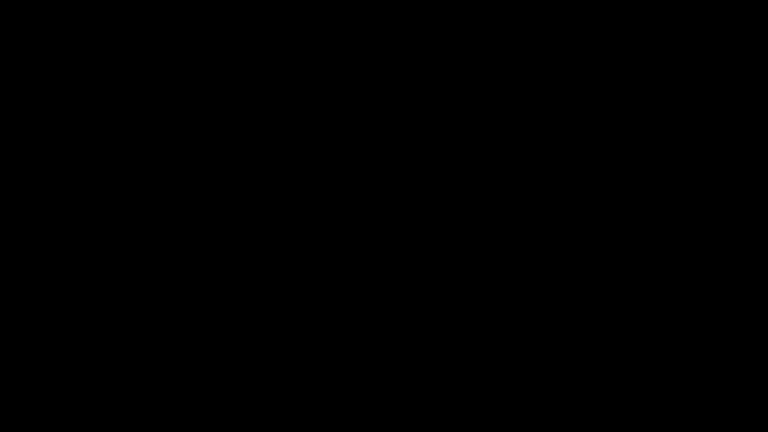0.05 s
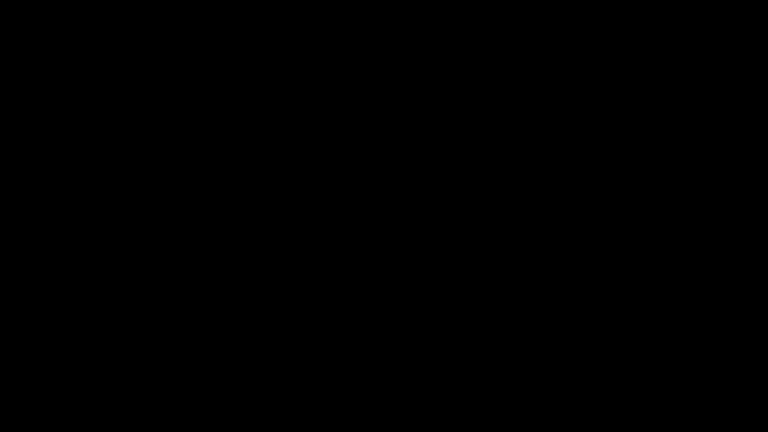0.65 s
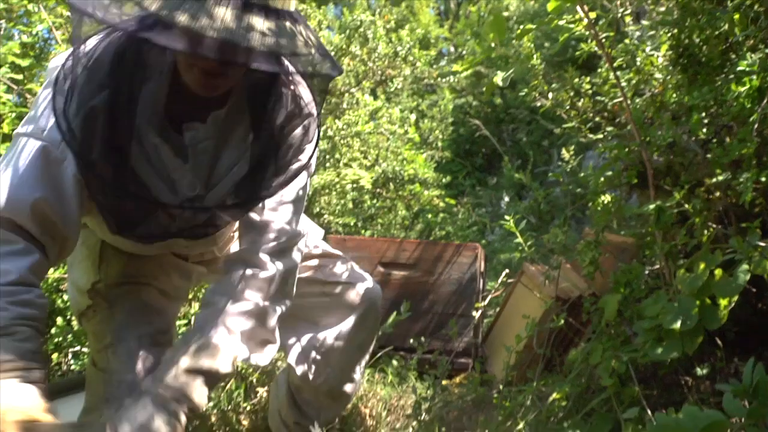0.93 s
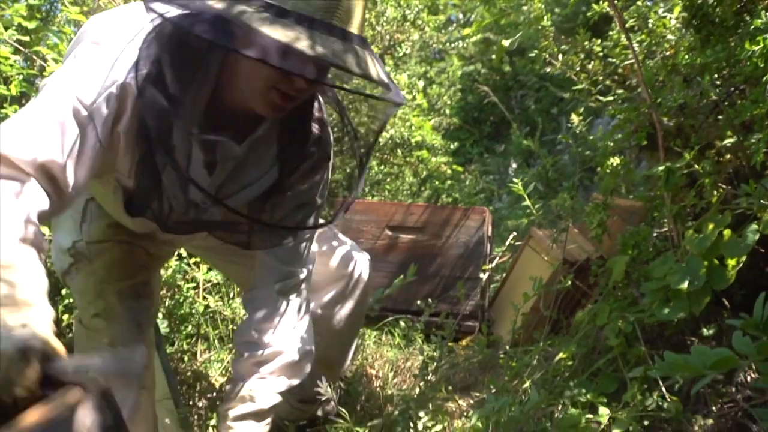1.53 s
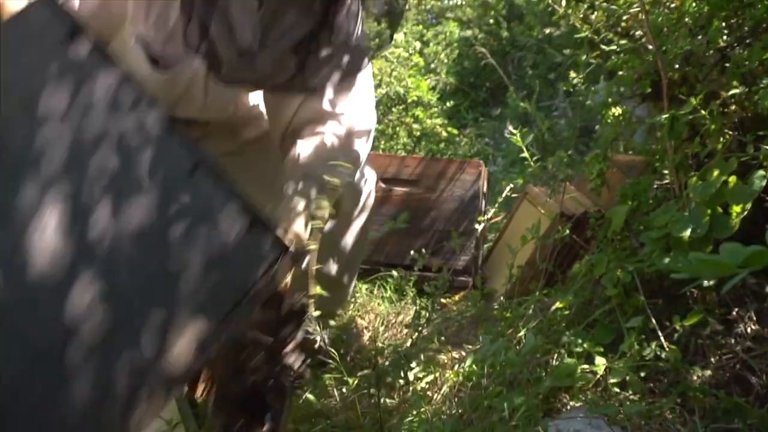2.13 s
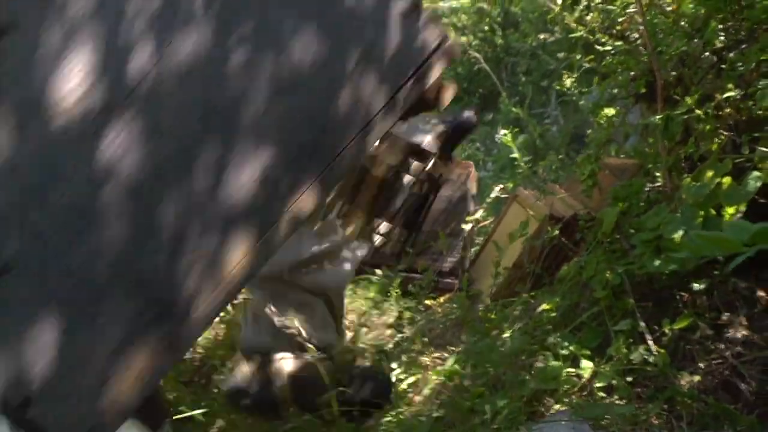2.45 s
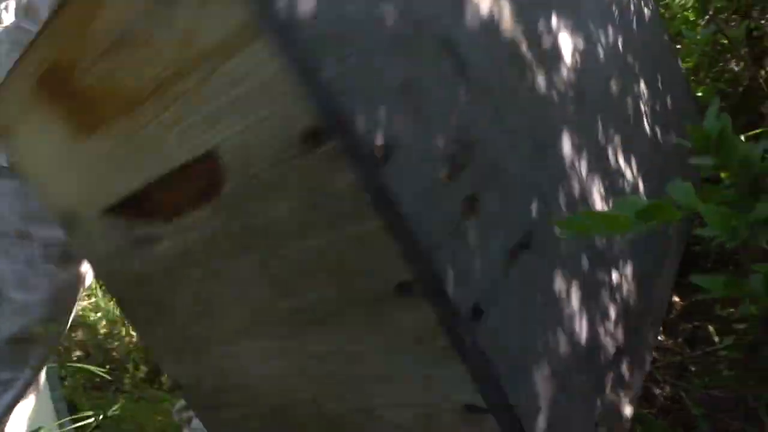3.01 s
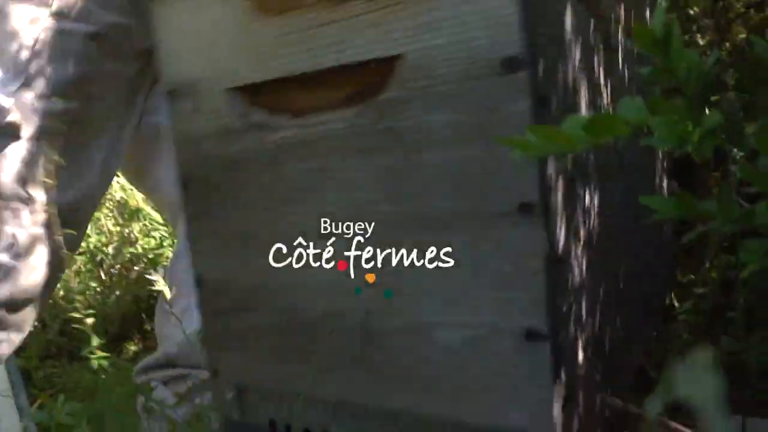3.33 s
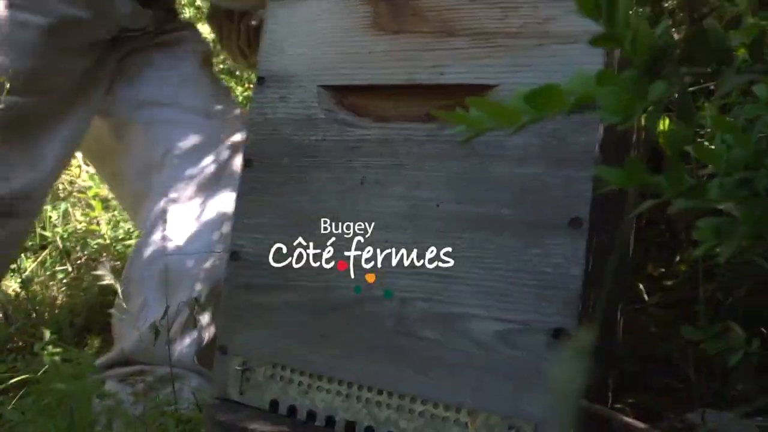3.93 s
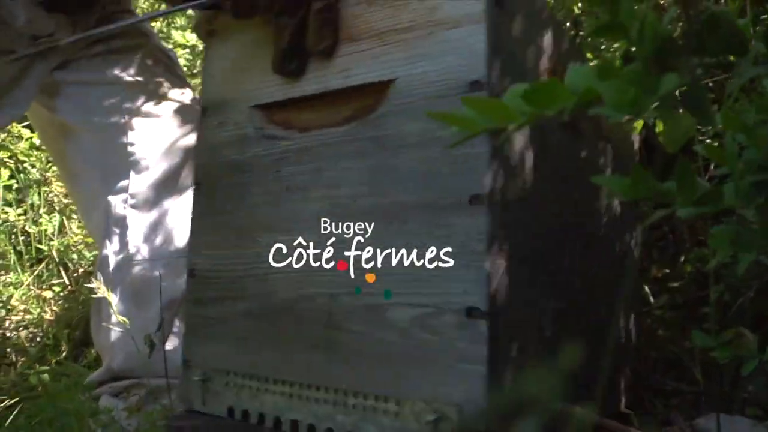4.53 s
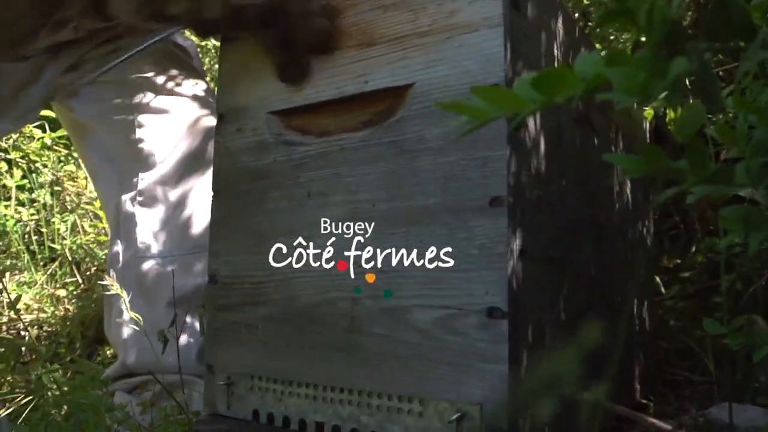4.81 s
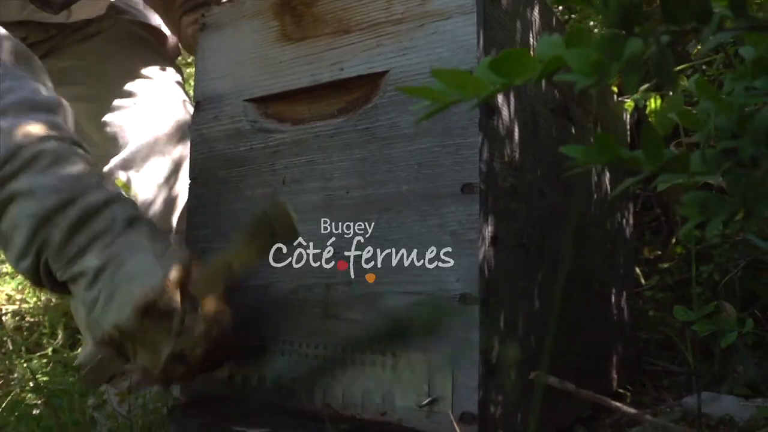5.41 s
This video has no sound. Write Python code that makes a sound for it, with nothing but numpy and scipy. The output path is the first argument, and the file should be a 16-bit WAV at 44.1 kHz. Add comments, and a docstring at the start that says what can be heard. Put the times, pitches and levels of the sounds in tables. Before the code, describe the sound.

Outdoors, a wooden hive box is dragged out of the grass close by, with cloth rustling and dry stems snapping. It bumps down with hollow thuds, then is shoved into place, the wood rasping and briefly groaning. A steel tool clacks on the lid and ends with a short scrape and a sharp knock. Bees hum faintly over a low breeze while a small bird repeats a trill.

```python
"""A wooden hive box is dragged out of the grass, set on its floor board and shoved into place.
Bumps ring its modes; wood catching and slipping on wood judders, rasps and groans.
The beekeeper's steel hive tool clacks on the lid, then scrapes and knocks at the entrance.
Suit and grass rustle, dry stems snap, bees' wing beats hum faintly over a low breeze,
and a small bird repeats a trill in the trees."""
import sys
import numpy as np
from scipy import signal
from scipy.fft import rfft, irfft, next_fast_len
from scipy.io import wavfile
from scipy.ndimage import map_coordinates

SR = 44100
rng = np.random.default_rng(int(sys.argv[2]) if len(sys.argv) > 2 else 0)


def master_out(mix):
    """Clip the mix to full scale and print it as 16-bit PCM to the path in sys.argv[1]."""
    frames = np.transpose(np.atleast_2d(mix))
    ceiling = np.clip(frames, -1, 1)
    pcm = np.round(ceiling * 32767).astype(np.int16)
    wavfile.write(sys.argv[1], SR, pcm)


N = 249606


def amp(db):
    """Decibels to gain."""
    return 10 ** (np.asarray(db) / 20)


def unit(x):
    """Scale to rms 1."""
    return x / np.sqrt(np.mean(x ** 2) + 1e-20)


def clock(seconds):
    """Sample times from zero."""
    return np.arange(int(seconds * SR)) / SR


def decay(t, t60_s):
    """Exponential fall, 60 dB in t60_s."""
    return np.exp(-np.log(1000) * t / t60_s)


def stroke(start_s, end_s, attack_s, t60_s):
    """Envelope of one movement: ramp, hold, decay."""
    t = np.arange(N) / SR
    return np.clip((t - start_s) / attack_s, 0, 1) * decay(np.maximum(t - end_s, 0), t60_s)


def curve_db(points):
    """Per-sample level through (s, dB) points, -120 dB outside them."""
    return np.interp(np.arange(N) / SR, *np.transpose(points), left=-120, right=-120)


def wobble(rate_hz):
    """Smooth random curve, rate_hz knots a second."""
    knots = rng.standard_normal(int(N * rate_hz / SR) + 4)
    return map_coordinates(knots, [np.arange(N) * rate_hz / SR])


def grains(rate_hz, spread_db):
    """Tiny random slips of scattered size and either sign."""
    size = amp(spread_db * np.clip(rng.standard_normal(N), -2, 2))
    return (rng.random(N) < rate_hz / SR) * rng.uniform(-1.11, 1, N) * size


def colour(x, spectrum):
    """Shape x by (Hz, dB) points on a log axis."""
    size = next_fast_len(len(x) + 8192)
    hz, db = np.transpose(spectrum)
    gain = amp(np.interp(np.log(np.fft.rfftfreq(size, 1 / SR) + 1), np.log(hz), db))
    return irfft(rfft(x, size) * gain, size)[:len(x)]


def band(x, lo_hz, hi_hz, order):
    """Causal band-pass."""
    return signal.sosfilt(signal.butter(order, [lo_hz, hi_hz], 'band', fs=SR, output='sos'), x)


def add(track, start_s, sound):
    """Mix a sound in at start_s."""
    start = max(round(start_s * SR), 0)
    part = sound[:max(N - start, 0)]
    track[start:start + len(part)] += part


# Each row: frequency in Hz, gain in dB.
AIR_SPECTRUM = [(12, -37), (20, 2), (41, -1.5), (134, -6), (241, -8.5), (285, -9), (422, -5), (607, -13.5),
                (1150, -12.5), (3530, -27.5), (4540, -14.5), (5080, -29), (14300, -38.5), (16000, -32)]
def air():
    """Soft outdoor hush."""
    return amp(-56.5) * unit(colour(rng.standard_normal(N), AIR_SPECTRUM))


# Each row: time in seconds, level in dB.
BREEZE_LEVELS = [(0.1, -75), (0.7, -54), (1.82, -53), (2.52, -57.5), (3.95, -43.5), (5.04, -50),
                 (5.66, -49.5)]
def breeze_and_handling():
    """Low, uneven breeze rumble, with a brief jolt of handling noise once the box is down."""
    spectrum = [(8, -17.5), (20, 8.5), (35, -1), (65, -12.5), (95, -3.5), (125, -26), (300, -76)]
    rumble = unit(colour(rng.standard_normal(N), spectrum))
    jolt = amp(-47.5) * stroke(start_s=3.91, end_s=3.97, attack_s=.027, t60_s=.18)
    return (amp(curve_db(BREEZE_LEVELS)) + jolt) * rumble


def bees(count=7):
    """Each bee is a stack of wing-beat harmonics wandering in pitch and distance."""
    hum = np.zeros(N)
    for wing_hz in np.linspace(175, 250, count):
        drift = 1 + .049 * wobble(3.3) + .00876 * wobble(25)
        phase = 2 * np.pi * np.cumsum(wing_hz * drift) / SR
        hum += amp(2.4 * wobble(1.2)) * signal.sawtooth(phase)
    spectrum = [(200, -1), (420, -4), (1000, 3.5), (3000, -12), (7000, -24)]
    return amp(-63.5) * unit(colour(hum, spectrum))


# Each row: time in seconds, level in dB.
RUSTLE_LEVELS = [(0.15, -92), (0.49, -71), (0.76, -65), (1.13, -62), (1.55, -66.5), (1.75, -58.5),
                 (1.99, -60), (2.14, -74), (2.48, -73), (2.88, -65), (3.57, -60.5), (3.88, -69.5),
                 (4.19, -67.5), (4.4, -61), (4.74, -62.5), (4.92, -73.5), (5.4, -68.5), (5.66, -69.5)]
# Each row: frequency in Hz, gain in dB.
CLOTH_SPECTRUM = [(150, -12), (400, 3), (1000, -2.5), (2500, 4), (6000, -2.5), (9000, -4.5), (14000, -17),
                  (16000, -68)]
def rustle(stir_s=.027):
    """Suit fabric hisses, grass crackles in clumps; each shove of the hive stirs both."""
    hiss = unit(colour(rng.standard_normal(N), CLOTH_SPECTRUM)) * amp(1.2 * wobble(40))
    clumps = amp(3 * wobble(45)) * grains(rate_hz=800, spread_db=3.8)
    crackle = unit(colour(clumps, [(800, -14), (3000, -2), (7000, 0), (16000, -8)]))
    stirs = sum(stroke(s, s + stir_s, stir_s, t60_s=.045) for s, *_ in HIVE_SHOVES)
    envelope = amp(curve_db(RUSTLE_LEVELS) + 1) + amp(-52.5) * stirs
    return envelope * (amp(1.3) * hiss + amp(-1.7) * crackle)


def chirp(start_hz, end_hz, seconds):
    """Gliding whistle that swells and fades."""
    progress = clock(seconds) / seconds
    hz = start_hz + (end_hz - start_hz) * progress
    return np.sin(np.pi * progress) * np.sin(2 * np.pi * np.cumsum(hz) / SR)


# Each row: start in seconds, level in dB.
TRILL_CALLS = [(0.227, -59), (0.484, -59.5), (0.724, -59.5), (0.928, -58.5), (1.179, -58), (1.55, -61.5),
               (2.019, -59.5), (2.149, -61), (2.39, -59.5), (2.653, -58), (2.884, -59.5), (3.11, -61.5),
               (3.641, -60.5), (3.888, -61.5), (4.111, -60), (4.919, -65)]
# Other birds. Each row: start in seconds, start pitch in Hz, end pitch in Hz, level in dB.
WHISTLE_CALLS = [(4.05, 5970, 5150, -57.5), (5.11, 6300, 4950, -52), (5.601, 3340, 3020, -55)]
def birds(flicks=4, flick_gap_s=.029, rise_delay_s=.06):
    """Trills of falling flicks over a thin rising note, and lone whistles; the trees smear them."""
    song = np.zeros(N)
    for start_s, db in TRILL_CALLS:
        for k in range(flicks):
            pitch = 1 + .012 * rng.standard_normal()
            flick_s = start_s + k * flick_gap_s + rng.normal(0, .003)
            gain = amp(db + 7 + rng.normal(0, 2))
            add(song, flick_s, gain * chirp(4720 * pitch, 4260 * pitch, seconds=.018))
        add(song, start_s + rise_delay_s, amp(db - 2) * chirp(4600, 4880, seconds=.11))
    for start_s, start_hz, end_hz, db in WHISTLE_CALLS:
        add(song, start_s, amp(db) * chirp(start_hz, end_hz, seconds=.06))
    t = clock(.5)
    trees = rng.standard_normal(len(t)) * decay(t, .26)
    reverb = signal.fftconvolve(song, trees / np.linalg.norm(trees))[:N]
    return amp(-3) * song + amp(-7) * reverb


# Each row: start in seconds, level in dB, pitch in Hz, relative fizz level in dB.
STEM_SNAPS = [(0.983, -48.5, 3300, -22), (1.138, -51.5, 2990, 3), (1.176, -43, 3320, -7),
              (1.362, -35, 1960, -14.5), (1.5162, -37, 2500, -7), (1.717, -38, 2330, -2.5),
              (1.8379, -24.5, 2240, -1), (1.89, -27, 2270, 0), (2.1391, -31.5, 2850, -19),
              (3.6965, -20.5, 2430, -18.5), (3.783, -48, 3400, -6), (3.824, -39.5, 3340, -6.5),
              (4.905, -37, 2854, -8), (4.9206, -35, 3000, -11), (5.1117, -42.5, 2930, -23),
              (5.1447, -40, 3140, -30), (5.219, -36, 2880, -21)]
def snaps():
    """Dry stems and small clicks: a pitched pip, a wider splinter of noise and a high fizz."""
    out, t = np.zeros(N), clock(.1)
    envelope = decay(t, .04) + amp(-13) * decay(t, .13)
    for start_s, db, hz, fizz_db in STEM_SNAPS:
        pip, splinter, fizz = rng.standard_normal((3, len(t)))
        pip = amp(-8.5) * unit(band(pip, hz * .95, hz * 1.05, order=2))
        splinter = amp(-8) * unit(band(splinter, hz * .25, hz * 1.19, order=2))
        fizz = amp(fizz_db - 4.5) * unit(band(fizz, 5000, 8400, order=1))
        add(out, start_s, amp(db) * (pip + splinter + fizz) * envelope)
    return out


# Registers: boom, body, clack, crack. Each row: low edge in Hz, high edge in Hz.
REGISTERS_HZ = [(150, 380), (380, 700), (700, 2000), (2000, 16000)]
# Each entry: a register's gain in dB per dB of contact hardness.
HARDNESS_SLOPES = [0, .5, .8, 1.3]
def blows(hits, modes, voice_db, burst_db, burst_t60_s, tail_db, tail_t60_s, cutoff_hz, attack_s):
    """Each blow rings the modes over a noise burst of dense, short ones; hardness lifts the treble."""
    out, t = np.zeros(N), clock(.5)
    onset = t < .02
    hz, mode_db, t60_s = np.transpose(modes)[:, :, None]
    for start_s, level_db, hardness_db, body_db in hits:
        weights_db = np.add(voice_db, hardness_db * np.array(HARDNESS_SLOPES)) + [0, body_db, 0, 0]
        gains = amp(mode_db + rng.standard_normal(hz.shape))
        phases = .5 * rng.standard_normal(hz.shape)
        ring = gains * decay(t, t60_s) * np.sin(2 * np.pi * hz * t + phases)
        envelope = decay(t, burst_t60_s) + amp(tail_db) * decay(t, tail_t60_s)
        burst = rng.standard_normal(len(t)) * envelope
        burst = signal.lfilter(*signal.butter(2, cutoff_hz, fs=SR), burst)
        for (lo_hz, hi_hz), weight_db in zip(REGISTERS_HZ, weights_db):
            inside = (hz[:, 0] >= lo_hz) & (hz[:, 0] < hi_hz)
            tones = ring[inside].sum(0) * (1 - np.exp(-t * lo_hz))  # low modes build more slowly
            noise = band(burst, lo_hz, hi_hz, order=4)
            density = amp(burst_db) * np.sqrt(lo_hz / 700)  # modes crowd as pitch rises
            part = tones / (np.std(tones[onset]) + 1e-9) + density * noise / np.std(noise[onset])
            part *= 1 - np.exp(-t / attack_s)  # soft wood gives before it stops
            add(out, start_s, amp(level_db + weight_db) * part / np.std(part[onset]))
    return out


# Each row: start in seconds, level in dB, hardness in dB, extra body from the spot struck in dB.
BOX_BUMPS = [(1.263, -35.5, -3, -22), (1.469, -45, 2, 5), (1.569, -30, -3, -0.5), (1.88, -27, 0, 2.5),
             (1.992, -41.5, 10, 6), (3.188, -19.5, -44, -23), (3.4825, -19.5, -6.5, 9), (3.523, -24, -3, 3),
             (3.546, -30.5, -10, 17.5), (3.607, -36.5, 7.5, 5), (3.623, -24, -23, 6),
             (3.693, -13, -16, -0.5)]
# Each row: frequency in Hz, level in dB, t60 in seconds.
BOX_MODES = [(242, -29, 0.072), (275.8, 8, 0.078), (302.5, 2.5, 0.068), (382, -2, 0.077),
             (466.3, -7.5, 0.27), (577, -1, 0.021), (811, -2, 0.051), (1096, -13, 0.093),
             (1585, -16.5, 0.13), (2300, -15, 0.077), (2446, -11, 0.066)]
# Each entry: a register's gain in dB.
BOX_REGISTERS_DB = [-0.5, -6.5, -4.5, -14]
def box_bumps():
    """The held box bumps and booms."""
    return amp(-4.5) * blows(BOX_BUMPS, BOX_MODES, BOX_REGISTERS_DB, burst_db=-1.5, burst_t60_s=.058,
                             tail_db=-16.5, tail_t60_s=.16, cutoff_hz=2860, attack_s=.0015)


def ground_thuds(base_db=-22, db_per_bump_db=.57):
    """The ground takes the weight of each bump with a dull, low push."""
    out, t = np.zeros(N), clock(.3)
    for start_s, bump_db, *_ in BOX_BUMPS:
        thud = unit(band(rng.standard_normal(len(t)), 20, 87, order=2)) * decay(t, .17)
        add(out, start_s, amp(base_db + db_per_bump_db * bump_db) * thud)
    return out


# Each row: start in seconds, level in dB.
BOARD_TAPS = [(1.266, -36), (1.36, -34), (2.007, -38.5), (3.137, -41.5), (3.235, -33), (3.437, -38),
              (3.762, -37.5), (4.345, -24.5), (4.828, -28.5), (5.432, -30)]
# Each row: frequency in Hz, level in dB, t60 in seconds.
BOARD_MODES = [(524.5, -16, 0.18), (780, 4, 0.046), (962, -2, 0.022), (1086, -11.5, 0.073),
               (1670, -38, 0.02)]
def board_taps(attack_s=.0037):
    """Soft contacts ring a loose board's few modes and barely click."""
    out, t = np.zeros(N), clock(.2)
    for start_s, db in BOARD_TAPS:
        ring = sum(amp(mode_db) * decay(t, t60_s) * np.sin(2 * np.pi * (hz * t + rng.random()))
                   for hz, mode_db, t60_s in BOARD_MODES)
        click = unit(band(rng.standard_normal(len(t)), 330, 1670, order=2)) * decay(t, .068)
        add(out, start_s, amp(db + 6.5) * (ring + amp(-10) * click) * (1 - np.exp(-t / attack_s)))
    return out


def resonate(x, modes, t60_scale):
    """Drive a box's modes, damped by the hands that hold it."""
    t = clock(.2)
    ring = sum(amp(db) * decay(t, t60_s * t60_scale) * np.cos(2 * np.pi * hz * t)
               for hz, db, t60_s in modes)
    return unit(signal.fftconvolve(x, ring)[:N])


# Each row: start in seconds, end in seconds, judder level in dB, rasp level in dB.
SLIDE_PUSHES = [(1.297, 1.341, -46, -44.5), (1.565, 2.007, -40, -47), (1.668, 1.746, -35, -41),
                (3.128, 3.811, -39, -47.5), (3.432, 3.547, -32.5, -52), (3.82, 4.148, -54.5, -58),
                (4.435, 4.534, -28, -42.5), (4.57, 4.818, -38.5, -47), (4.958, 4.969, -45, -56.5),
                (5.425, 5.536, -53, -41.5)]
# Each row, in both: frequency in Hz, gain in dB.
JUDDER_SPECTRUM = [(100, -16), (170, 1), (330, -3), (440, -4), (600, -4.5), (900, -18.5), (2000, -51)]
RASP_SPECTRUM = [(300, -51), (600, 4.5), (900, 5), (1200, 2.5), (1600, 3), (1950, -2), (2350, -5),
                 (3300, -7.5), (5000, -9.5), (9000, -37)]
def sliding():
    """Wood catches and slips: coarse slips ring the held box, later the seated hive; fine ones rasp."""
    judder_gain, rasp_gain = np.zeros((2, N))
    for start_s, end_s, judder_db, rasp_db in SLIDE_PUSHES:
        push = stroke(start_s, end_s, attack_s=.031, t60_s=.4)
        judder_gain = np.maximum(judder_gain, amp(judder_db) * push)
        rasp_gain = np.maximum(rasp_gain, amp(rasp_db) * push)
    grip = amp(2.5 * wobble(40))
    judder = unit(colour(grip * grains(rate_hz=900, spread_db=0), JUDDER_SPECTRUM))
    rasp = unit(colour(grip * grains(rate_hz=3000, spread_db=2.5), RASP_SPECTRUM))
    held = unit(judder + amp(-3) * resonate(judder, BOX_MODES, t60_scale=.8))
    seated = unit(judder + amp(2) * resonate(judder, HIVE_MODES, t60_scale=.8))
    rasp = unit(rasp + amp(-6.5) * resonate(rasp, BOX_MODES, t60_scale=.26))
    before_tool = np.arange(N) / SR < LID_CLACKS[0][0]
    return judder_gain * np.where(before_tool, held, seated) + rasp_gain * rasp


# Each row: start in seconds, end in seconds, level in dB.
SCUFF_STROKES = [(3.205, 3.462, -46.5), (4.454, 4.53, -42.5), (4.58, 4.707, -49.5), (4.74, 4.845, -46)]
# Each row: frequency in Hz, gain in dB.
SCUFF_SPECTRUM = [(900, -13.5), (1850, 1.5), (2300, 4.5), (2700, -3.5), (3000, -2.5), (3330, -1),
                  (3800, -16), (5200, -8), (6050, -9), (6800, -16.5), (16000, -44)]
def scuffs():
    """Smooth faces brush past each other in swells of fine, gritty hiss."""
    envelope = np.zeros(N)
    for start_s, end_s, db in SCUFF_STROKES:
        length_s = end_s - start_s
        add(envelope, start_s, amp(db) * np.sin(np.pi * clock(length_s) / length_s))
    return envelope * unit(colour(grains(rate_hz=4500, spread_db=-8), SCUFF_SPECTRUM))


# Each row: crest in seconds, slip rate in Hz, level in dB.
BOX_GROANS = [(3.207, 275.4, -23.5), (4.796, 287.3, -18), (5.573, 297, -39.5)]
def groans(swell_s=.0194):
    """For a moment the slips lock to a low mode of the box."""
    out = np.zeros(N)
    for crest_s, hz, db in BOX_GROANS:
        t = np.arange(N) / SR - crest_s
        swell = (1 + (t / swell_s) ** 2) ** -2
        phase = 2 * np.pi * hz * t + 2 * np.pi * rng.random()
        out += amp(db) * swell * np.sqrt(2) * (np.sin(phase) + amp(-23) * np.sin(2 * phase))
    return out


# Each row: start in seconds, level in dB, hardness in dB, extra body in dB.
LID_CLACKS = [(4.2054, -26.5, 4.5, -18), (4.212, -23.5, -5.5, 3.5), (4.529, -26, -13.5, -6),
              (4.535, -32, -7, -7)]
# Each row: frequency in Hz, level in dB, t60 in seconds.
LID_MODES = [(247, -8, .11), (460, -10, .12), (732, -2, .07), (802, -7, .16), (970, -7, .08),
             (1353, 1, .06), (1492, -1, .055), (2330, 2, .025), (2600, 3, .025), (3350, -8, .03)]
# Each entry: a register's gain in dB.
LID_REGISTERS_DB = [6, 6, 12.5, 4.5]
def lid_clacks():
    """The tool lands on the lid, bounces, and rattles at the shove."""
    return amp(-6.5) * blows(LID_CLACKS, LID_MODES, LID_REGISTERS_DB, burst_db=1, burst_t60_s=.018,
                             tail_db=-19, tail_t60_s=.16, cutoff_hz=2300, attack_s=.0008)


# Each row: frequency in Hz, level in dB, t60 in seconds.
BLADE_MODES = [(1696, -31, .28), (2105, -19, .115), (2826, -22, .155), (2961, -24, .12), (4757, -26, .11),
               (7090, -28.5, .1)]
def blade_ring():
    """First contact with the lid rings the steel blade's bending modes."""
    out, t = np.zeros(N), clock(.5)
    ring = sum(amp(db) * decay(t, t60_s) * np.sin(2 * np.pi * hz * t) for hz, db, t60_s in BLADE_MODES)
    add(out, LID_CLACKS[0][0], ring)
    return out


# Each row: start in seconds, level in dB, hardness in dB, extra body in dB.
HIVE_SHOVES = [(4.414, -33.5, 3, -3), (4.4324, -13, -5, 1.5), (4.456, -37, 20.5, -23),
               (4.485, -37.5, 15, 1), (4.621, -20.5, 1, -1.5)]
# Each row: frequency in Hz, level in dB, t60 in seconds.
HIVE_MODES = [(161, -2, 0.4), (224, 5, 0.2), (241.1, 2.5, 0.24), (263, 13, 0.021), (464, -6.5, .2),
              (540.5, 0.5, 0.114), (570, 7, 0.026), (773, -13, 0.087), (1140, -23, 0.15),
              (1405, -21, 0.066), (1830, -29.5, 0.22), (2450, -28, 0.35)]
# Each entry: a register's gain in dB.
HIVE_REGISTERS_DB = [0, -0.5, -14, -31.5]
def hive_thumps():
    """The seated hive is shoved against its floor board."""
    return amp(.5) * blows(HIVE_SHOVES, HIVE_MODES, HIVE_REGISTERS_DB, burst_db=-3, burst_t60_s=.025,
                           tail_db=-18, tail_t60_s=.22, cutoff_hz=3000, attack_s=.0012)


# Each row: frequency in Hz, gain in dB.
SCRAPE_SPECTRUM = [(250, -20), (500, -18.5), (750, 5), (1050, -5), (1500, -6), (2100, -7), (3200, -11),
                   (5000, -16.5), (12000, -32), (16000, -36)]
def blade_scrape(start_s=5.485, start_db=-28, rise_db_per_s=378):
    """The steel blade bites harder until the last knock on the board's edge."""
    end_s = EDGE_KNOCKS[-1][0]
    elapsed_s = np.clip(np.arange(N) / SR, start_s, end_s) - start_s
    bite = amp(start_db + rise_db_per_s * elapsed_s)
    grit = unit(colour(grains(rate_hz=8100, spread_db=-.5), SCRAPE_SPECTRUM))
    return bite * stroke(start_s, end_s, attack_s=.009, t60_s=.02) * grit


# Each row: start in seconds, level in dB, hardness in dB, extra body in dB.
EDGE_KNOCKS = [(5.5078, -33, 1, 4.5), (5.5175, -26, 1.75, -16)]
# Each row: frequency in Hz, level in dB, t60 in seconds.
EDGE_MODES = [(257.5, -17, 0.22), (533, -16, 0.19), (725, 8, 0.055), (980, -8, .05), (1433, 6, 0.08),
              (1590, 6, 0.035), (2080, -3, .04), (2670, -5, 0.039), (2920, -13, 0.12), (5160, -17, 0.06)]
# Each entry: a register's gain in dB.
EDGE_REGISTERS_DB = [-1.5, -5, 14.5, 4.5]
def edge_knocks():
    """The tool knocks sharply on a board's edge at the entrance."""
    return amp(-2.5) * blows(EDGE_KNOCKS, EDGE_MODES, EDGE_REGISTERS_DB, burst_db=0, burst_t60_s=.018,
                             tail_db=-27, tail_t60_s=.13, cutoff_hz=10000, attack_s=.0003)


def scene(fade_s=.61):
    """The background fades in, then the work begins; mono."""
    hush, rumble = air(), breeze_and_handling()
    fade = np.minimum(np.arange(N) / SR / fade_s, 1) ** 1.55
    background = fade * (hush + bees() + birds()) + rumble
    friction = rustle() + sliding() + scuffs() + groans() + blade_scrape()
    knocks = box_bumps() + hive_thumps() + lid_clacks() + edge_knocks() + blade_ring()
    return (background + friction + knocks + ground_thuds() + board_taps() + snaps())[None]


def record(dry, cutoff_hz=16100):
    """Soft clip, then brick-wall low-pass."""
    clipped = dry / (1 + np.abs(dry) ** 6) ** (1 / 6)
    size = next_fast_len(N + 8192)
    passband = np.fft.rfftfreq(size, 1 / SR) < cutoff_hz
    return irfft(rfft(clipped, size) * passband, size)[:, :N]


dry = scene()
out = record(dry)
master_out(out)
```